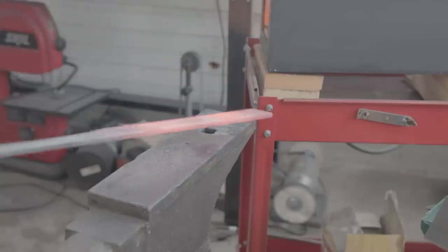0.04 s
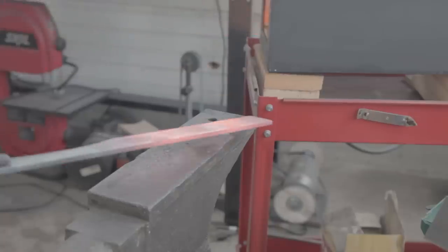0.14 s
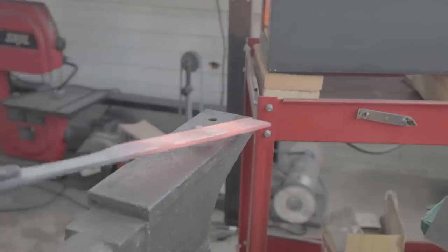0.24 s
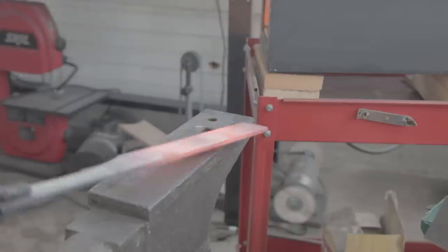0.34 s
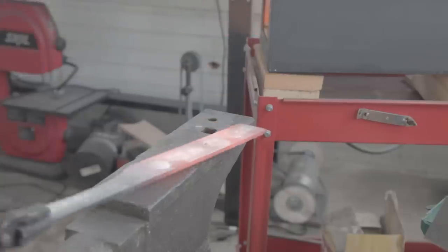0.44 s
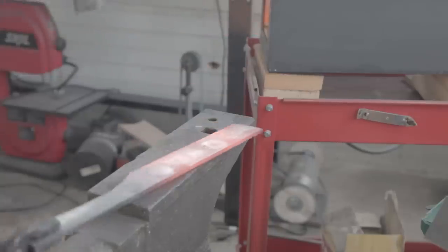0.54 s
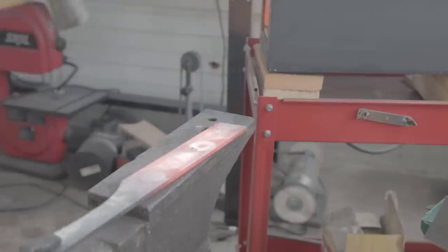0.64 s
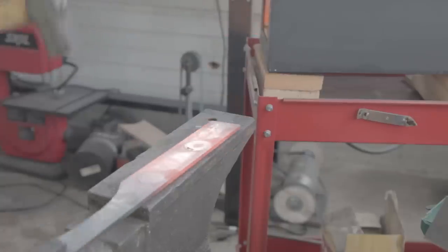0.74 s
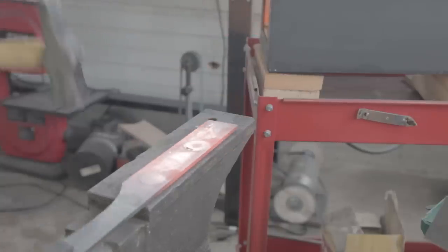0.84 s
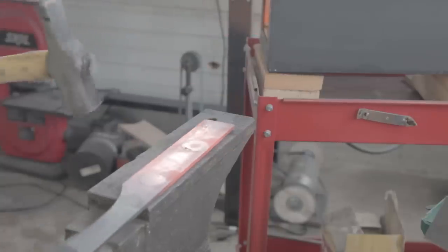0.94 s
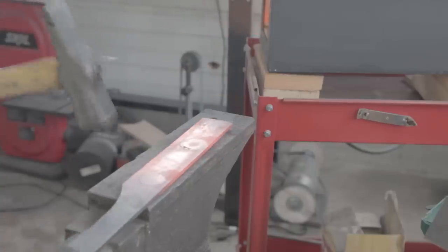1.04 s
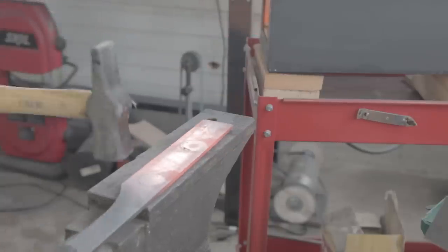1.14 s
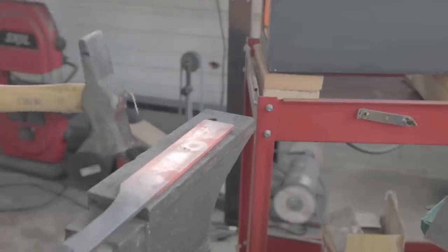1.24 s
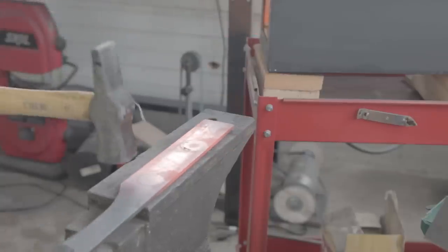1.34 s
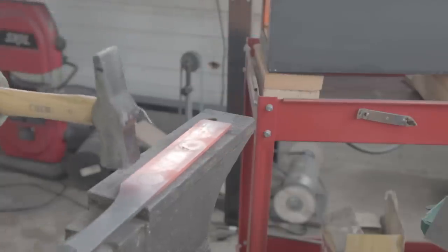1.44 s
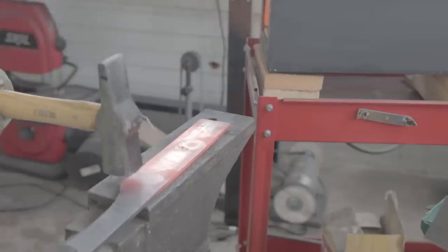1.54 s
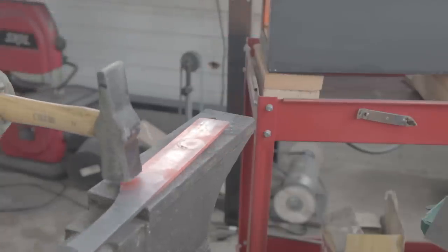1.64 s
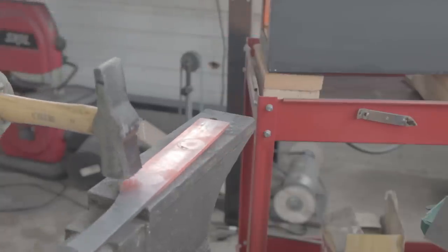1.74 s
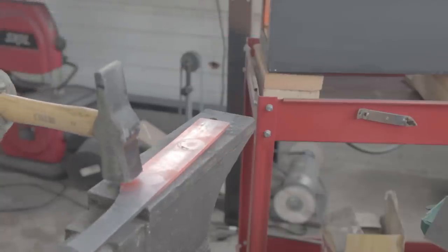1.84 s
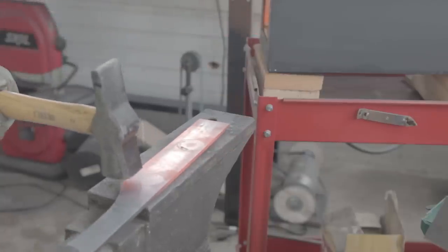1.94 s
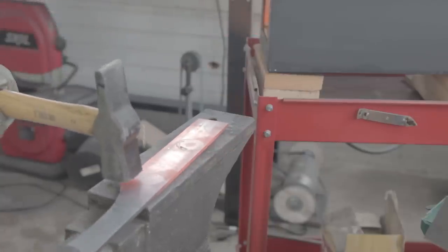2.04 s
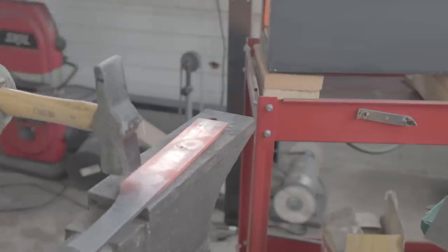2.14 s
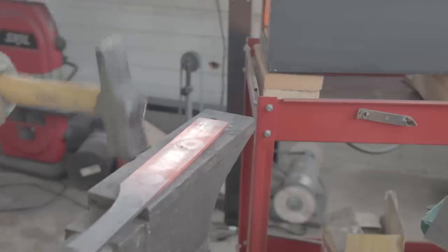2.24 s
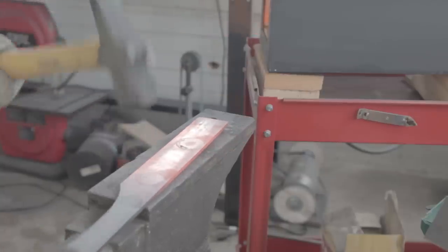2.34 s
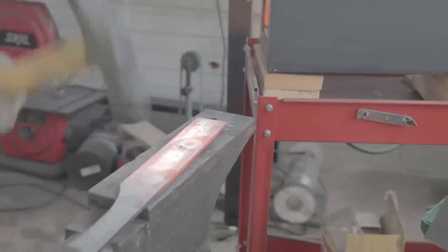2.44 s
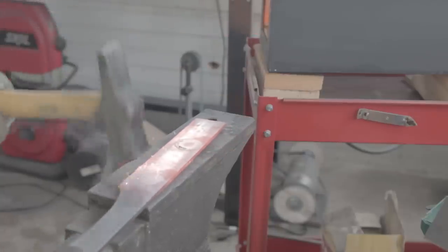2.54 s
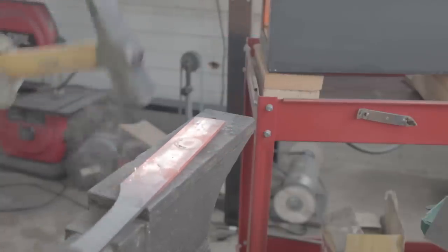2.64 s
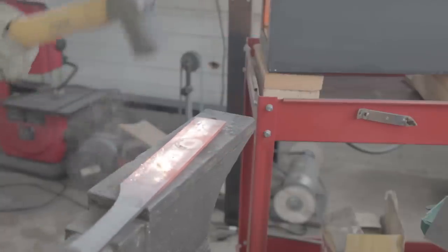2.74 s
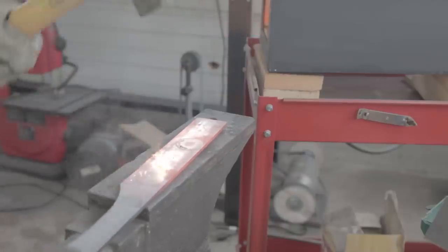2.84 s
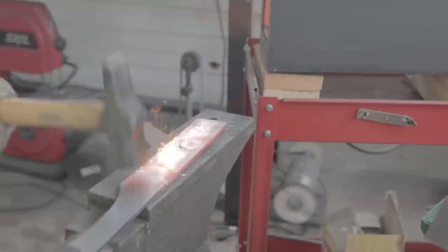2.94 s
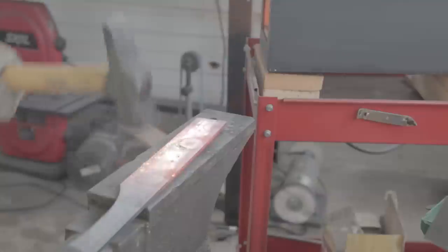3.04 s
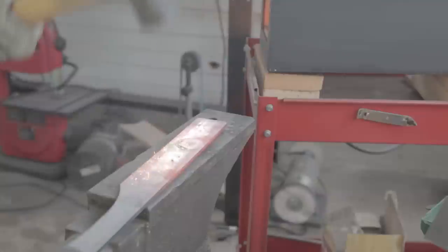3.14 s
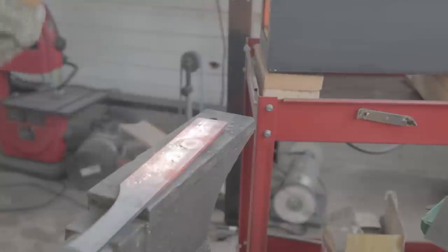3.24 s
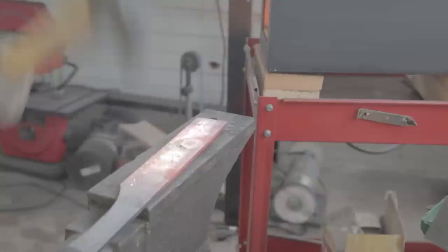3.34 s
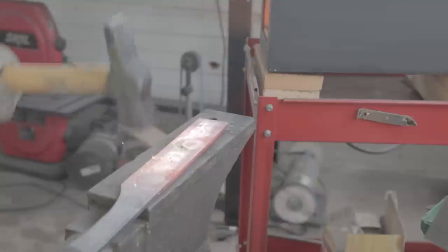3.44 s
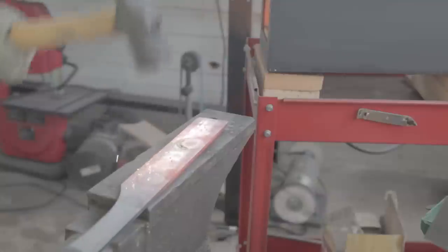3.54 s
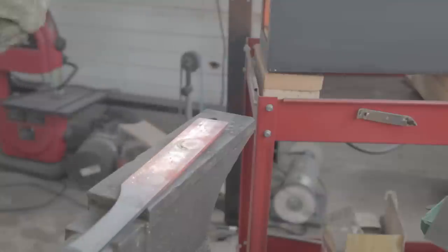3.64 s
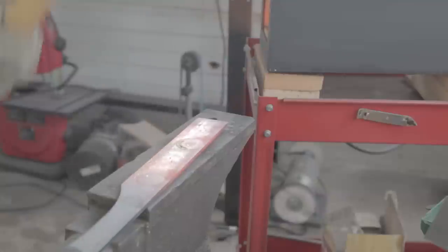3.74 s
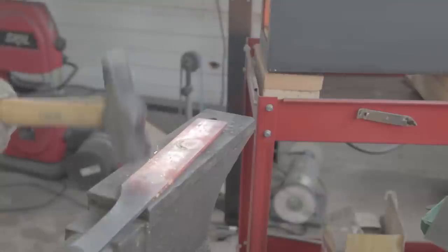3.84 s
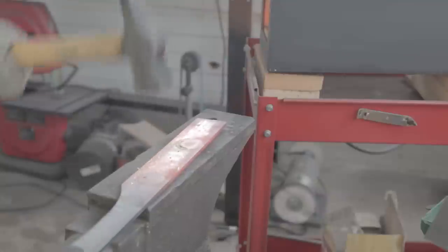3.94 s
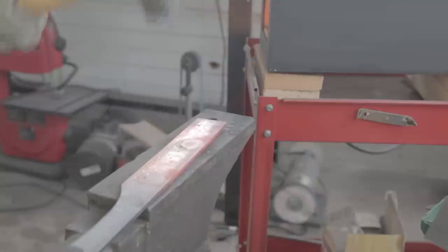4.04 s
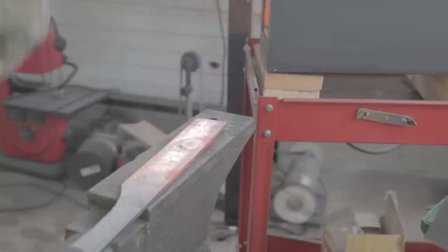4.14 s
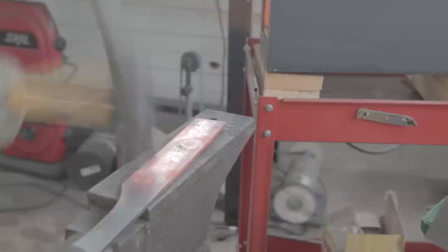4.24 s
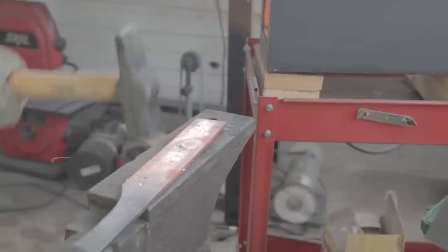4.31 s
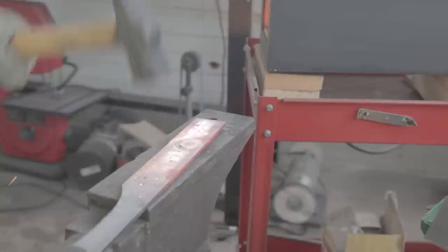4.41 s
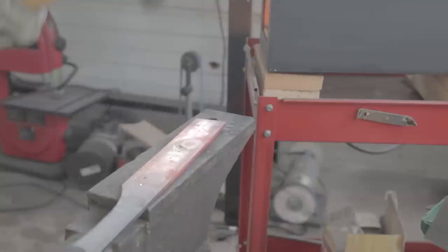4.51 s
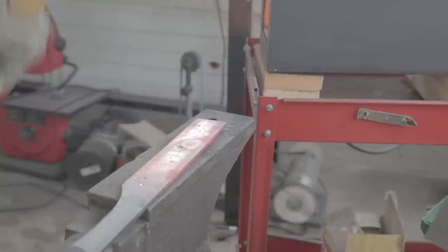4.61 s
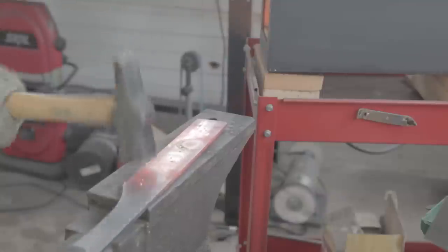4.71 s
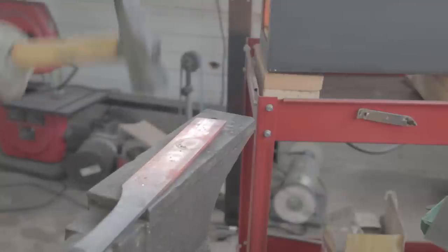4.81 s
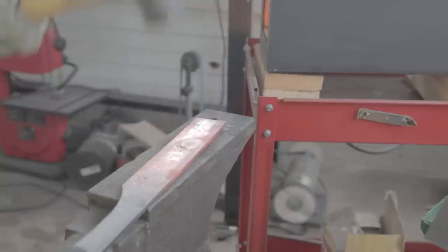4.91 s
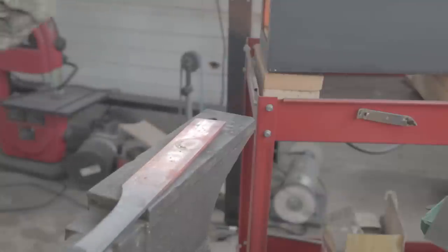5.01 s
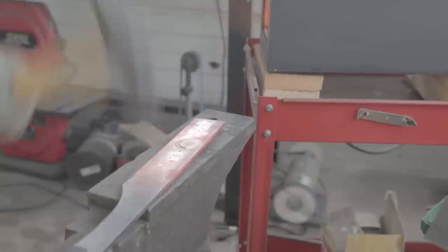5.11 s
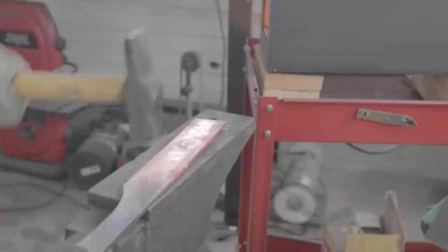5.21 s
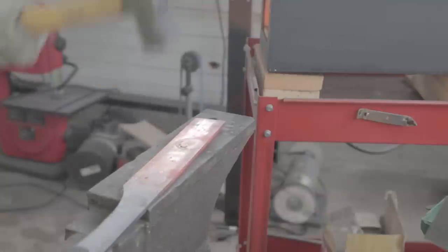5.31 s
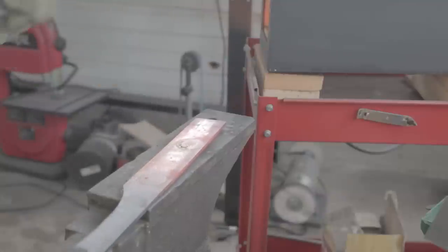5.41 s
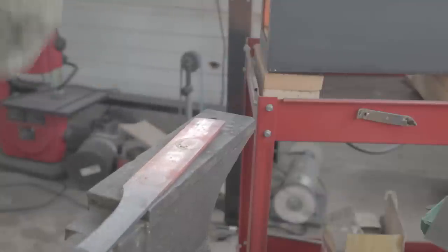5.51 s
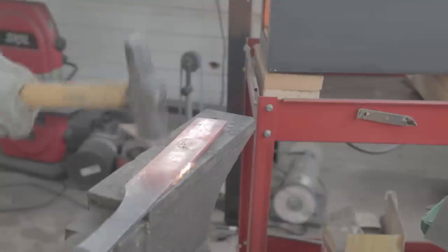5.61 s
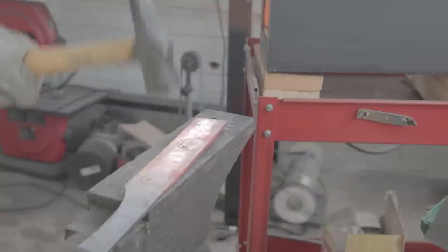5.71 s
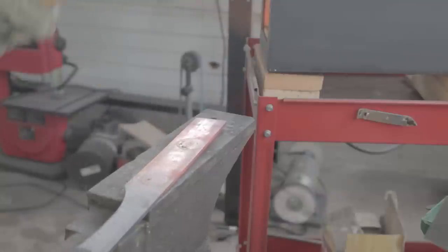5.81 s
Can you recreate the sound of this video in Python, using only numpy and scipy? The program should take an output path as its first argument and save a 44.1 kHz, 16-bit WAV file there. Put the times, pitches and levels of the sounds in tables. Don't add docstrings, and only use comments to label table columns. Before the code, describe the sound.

Low fluttering burner roar with thin gas hiss, a soft glove rub, then eight evenly spaced hard metallic hammer strikes that make the roar dip.

```python
import sys
import numpy as np
from scipy import signal
from scipy.fft import rfft, irfft, next_fast_len
from scipy.io import wavfile
from scipy.ndimage import uniform_filter1d, map_coordinates

SR = 44100
rng = np.random.default_rng(int(sys.argv[2]) if len(sys.argv) > 2 else 0)


def volts_from_db(level):
    exponent = np.asarray(level, float) / 20
    return 10 ** exponent


def wav_out(sig):
    wavfile.write(sys.argv[1], SR, np.round(np.clip(np.atleast_2d(sig).T, -1, 1) * 32767).astype(np.int16))


N = 258867


def along(points, hz):
    f, v = np.transpose(points)
    return np.interp(np.log(hz + 1), np.log(f + 1), v)


def curves(rows):
    s, *cols = np.transpose(rows)
    return [np.interp(np.arange(N) / SR, s, c) for c in cols]


def unit(x):
    return x / np.sqrt(np.mean(x ** 2) + 1e-20)


def wobble(rate):
    knots = rng.standard_normal(int(N * rate / SR) + 4)
    return map_coordinates(knots, [np.arange(N) * rate / SR])


def filtered(x, db_of, causal=False):
    m = 2 * next_fast_len(len(x) // 2 + 4096)
    gain = volts_from_db(np.maximum(db_of(np.fft.rfftfreq(m, 1 / SR)), -120))
    if causal:
        cepstrum = irfft(np.log(gain), m)
        fold = np.r_[1, np.full(m // 2 - 1, 2.), 1, np.zeros(m // 2 - 1)]
        gain = np.exp(rfft(cepstrum * fold))
    return irfft(rfft(x, m) * gain, m)[:len(x)]


def rush(db_of, patchy_db):
    z = signal.stft(rng.standard_normal(N), nperseg=512)[2]
    field = uniform_filter1d(rng.standard_normal(z.shape), size=5, axis=0)
    field = uniform_filter1d(field, size=10, axis=1)
    patchy = signal.istft(z * volts_from_db(patchy_db * unit(field)), nperseg=512)[1][:N]
    return unit(filtered(patchy, db_of))


def burst(spectrum, t60, t):
    noise = filtered(rng.standard_normal(len(t)), lambda hz: along(spectrum, hz))
    return volts_from_db(-60 * t / t60) * unit(noise)


def since_blows():
    return np.arange(N) / SR - np.array(BLOWS)[:, :1]


def ducking_db():
    attack_s = 0.09
    quick_db, quick_release_s = 9.5, 0.33
    pile_db, pile_release_s = 1.7, 2.2
    since = np.maximum(since_blows(), 0)
    caught = 1 - np.exp(-since / attack_s)
    quick = quick_db * np.max(caught * np.exp(-since / quick_release_s), axis=0)
    piled = pile_db * np.sum(caught * np.exp(-since / pile_release_s), axis=0)
    return np.hypot(quick, piled)


# frequency in Hz, level in dB per Hz.
FLAME_ROAR = [(13, -70), (22, -40), (38, -39), (86, -15.5), (118, -9.5), (202, -4.5), (237, -4.5),
              (421, -3), (544, -15), (809, -23.5), (858, -24.5), (1200, -20.5), (1440, -29), (1620, -35),
              (2500, -66.5), (3250, -73), (5500, -120)]
# frequency in Hz, level in dB per Hz.
GAS_HISS = [(880, -11), (1500, -7.5), (1640, -1.5), (1750, -6), (2160, -8), (2500, -11), (2700, -11.5),
            (2980, -14.5), (3350, -11), (5630, -17.5), (11400, -20), (13200, -21.5), (15600, -17.5)]
# frequency in Hz, width in Hz, lift in dB.
TUBE_MODES = [(52.7, 10, 16.5), (76.7, 4.1, 9), (87, 13, 1.5), (122.8, 19.5, 9), (192.6, 46, 3.5),
              (241.1, 22, 9.5), (334.6, 62, 7), (443, 47, 1), (629.6, 26, 4.5), (872.6, 11, 10),
              (1243, 15, 7), (1610, 79, 3), (2120, 45, 11), (2747, 65, 10.5), (3330, 230, 6),
              (3750, 310, 5.5), (5070, 210, 4.5), (13500, 500, 6), (13100, 520, 6)]
# time in seconds, lift of the roar in dB.
FLAME_PUSH = [(0, 1), (.9, 0), (1.5, 0.4), (1.8, -0.2), (2.5, -1), (2.9, 2), (3.17, -3.5), (3.28, 2),
              (3.5, -2), (4.15, 0.5), (4.8, -0.5), (5.45, -1), (5.6, -0.5), (5.87, 0)]


def forge():
    roar_level_db, hiss_level_db = -16.5, -37.5
    roar_ducks = 0.99
    duck_db = ducking_db()

    def tube_db(hz):
        return sum(lift / (1 + (2 * (hz - c) / width) ** 2) for c, width, lift in TUBE_MODES)

    roar = rush(lambda hz: along(FLAME_ROAR, hz) + tube_db(hz), patchy_db=0.5)
    hiss = rush(lambda hz: along(GAS_HISS, hz) + tube_db(hz), patchy_db=0.1)
    roar_db = roar_level_db + curves(FLAME_PUSH)[0] - roar_ducks * duck_db + 0.31 * wobble(11)
    hiss_db = hiss_level_db - duck_db + 0.097 * wobble(4.7)
    return volts_from_db(roar_db) * roar + volts_from_db(hiss_db) * hiss


# frequency in Hz, level in dB per Hz.
CLOTH_COLOUR = [(500, -27), (1000, 6), (2000, -1), (3500, -0.5), (5000, -9), (7500, -19), (9000, -24),
                (12000, -32)]
# start in seconds, hold in seconds, level in dB.
CLOTH_RUBS = [
    (0.33, 0.046, -38),
    (.52, 0.027, -45),
    (0.655, 0.11, -32),
]


def rustle():
    rise_db_s, fall_db_s = 220, 142
    t = np.arange(N) / SR
    rubs = np.zeros(N)
    for s, hold, db in CLOTH_RUBS:
        rise = rise_db_s * np.maximum(s - t, 0)
        fall = fall_db_s * np.maximum(t - s - hold, 0)
        rubs += volts_from_db(db - rise - fall)
    return rubs * volts_from_db(0.8 * wobble(40)) * rush(lambda hz: along(CLOTH_COLOUR, hz), patchy_db=0.4)


# frequency in Hz, t60 in seconds.
SHOP_T60 = [(200, 0.84), (1000, 0.74), (3000, 0.7), (5000, 0.51), (9000, 0.36), (16000, 0.34)]


def shop(x):
    hz, t, z = signal.stft(rng.standard_normal(len(x)), SR, nperseg=256)
    tail = signal.istft(z * volts_from_db(-60 * t / along(SHOP_T60, hz)[:, None]), SR, nperseg=256)[1]
    fade_in = np.clip(np.arange(len(tail)) / SR / 0.0011, 0, 1)
    answer = signal.fftconvolve(x, tail * fade_in)[:len(x)]
    return answer * np.linalg.norm(x) / np.linalg.norm(answer)


def ring(modes_hz, modes, t):
    return sum(volts_from_db(db - 60 * t / t60) * np.sin(2 * np.pi * hz * t)
               for hz, (db, t60) in zip(modes_hz, modes))


# start in seconds, then levels in dB of the strike, anvil ring, hammer head ring
BLOWS = [
    (2.5176, -7.5, -0.5, -8.5, -12),
    (2.9652, -6, -2.5, -4.5, -18),
    (3.3913, -4.5, -0.5, -5, -11),
    (3.8381, -4.5, 1, -10.5, -13.5),
    (4.2778, -4, -4, -5.5, -22),
    (4.7211, -4.5, -6, -6, -42),
    (5.1617, -5, -10, -4, -18),
    (5.6166, -4.5, -9, -7, -7),
]
STEEL_HZ = [
    [1675, 1741, 1990, 2092, 2526],
    [3200, 3342, 3487, 3792],
    [4208, 4582, 9170, 9640, 10140],
    [6466, 7450],
]
# level in dB, t60 in seconds.
STEEL_MODES = [
    [(-20, 0.22), (-9.5, 0.19), (-25.5, 0.39), (-3, 0.14), (-5.5, 0.15)],
    [(-54.5, 0.04), (-13.5, 0.11), (7, 0.058), (-12, 0.15)],
    [(-7, 0.1), (-22, 0.088), (-30, 0.12), (-21, 0.11), (-36, 0.048)],
    [(4, 0.072), (-34, 0.049)],
]
# frequency in Hz, level in dB per Hz.
FIRST_CONTACT = [(1200, -20), (3000, -3), (7000, 0), (12000, -2), (15500, -3), (17000, -12)]
CRACK = [(300, -20), (700, -4.5), (1200, -4), (1800, 1), (2900, -3.5), (3500, -0.4), (4400, 0),
         (5000, -14.5), (6500, -8.5), (8000, -11), (12000, -19.5), (16500, -27)]
BAR_AND_TONGS = [(2500, -7.5), (5000, 7.5), (8000, 2.5), (12000, -6), (16000, -23)]
STAND_THUD = [(100, -31), (200, 21), (350, 9), (700, -14), (1300, -2), (2500, -74)]
FLOOR_BOOM = [(15, -18), (35, -9), (70, 13), (130, 8.5), (250, -6), (700, -70)]


def hammer():
    low_ring_db, upper_ring_db = -4, 2
    upper_follows = 0.26
    out = np.zeros(N + SR)
    t = np.arange(SR * 3 // 4) / SR
    click = filtered(1. * (t == 0), lambda hz: along(CRACK, hz), causal=True)
    click = click / np.linalg.norm(click)
    swell = 1 - np.exp(-t / 0.0025)
    for s, db, anvil_db, head_db, rattle_db in BLOWS:
        ring_db = low_ring_db, anvil_db, upper_ring_db + upper_follows * anvil_db, head_db
        families = [volts_from_db(g) * swell * ring(hz, m, t) for g, hz, m in zip(ring_db, STEEL_HZ, STEEL_MODES)]
        steel = volts_from_db(0.8) * sum(families) + volts_from_db(-2.5) * sum(shop(f) for f in families)
        snap = volts_from_db(4) * burst(FIRST_CONTACT, 0.003, t)
        crack = volts_from_db(1.0) * burst(CRACK, 0.067, t)
        rattle = volts_from_db(rattle_db) * shop(burst(BAR_AND_TONGS, 0.081, t))
        stand = volts_from_db(3.5) * burst(STAND_THUD, 0.05, t) + volts_from_db(-23.0) * burst(FLOOR_BOOM, 0.83, t)
        walls = volts_from_db(20.0) * shop(click)
        blow = snap + swell * (crack + rattle + stand) + steel + walls
        out[round(s * SR):][:len(t)] += volts_from_db(db + 1.5) * blow
    return out[:N]


def scene():
    return (forge() + rustle() + hammer())[None]


def band_limit(x):
    return signal.sosfilt(signal.butter(12, 16830, fs=SR, output="sos"), x)


# frequency in Hz, gain in dB.
WIDE_RESPONSE = [(10, -12), (30, 0), (16000, 0), (16600, -6), (16800, -20), (16900, -70)]
# frequency in Hz, gain in dB.
TOP_EDGE = [(15700, 0), (15800, -25), (15900, -100)]


def record(dry):
    since = since_blows()
    last = np.min(np.where(since >= 0, since, 9), axis=0)
    sag = 0.04 * np.exp(-last / 0.02)
    overshoot = 0.6 * volts_from_db(-1.6 * ducking_db()) * np.exp(-last / 0.0009)
    recovery = 0.25 * (1 - np.exp(-(last / 0.2) ** 2))
    top = 0.37 + sag + overshoot + recovery
    hardness = 10
    flat = dry[0] / (1 + np.abs(dry[0] / top) ** hardness) ** (1 / hardness)
    wide = filtered(flat, lambda hz: along(WIDE_RESPONSE, hz))
    narrow = filtered(wide, lambda hz: along(TOP_EDGE, hz))
    keep = np.sum(np.exp(-((since - 0.0005) / 0.002) ** 4), axis=0)
    mix = narrow + keep * (wide - narrow)
    return band_limit(mix[None])


dry = scene()
out = record(dry)
wav_out(out)
```